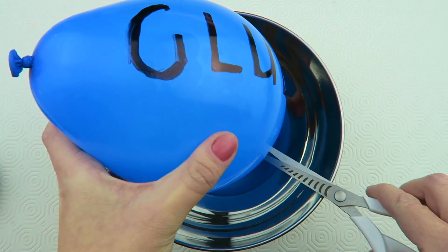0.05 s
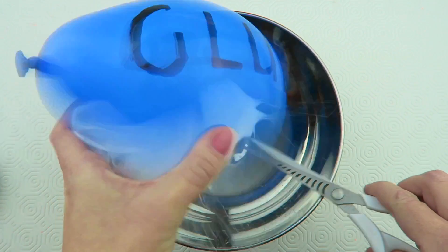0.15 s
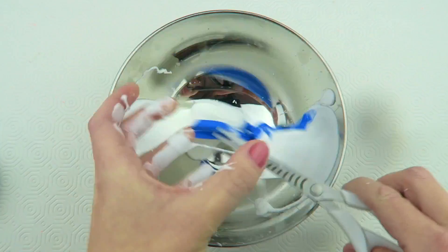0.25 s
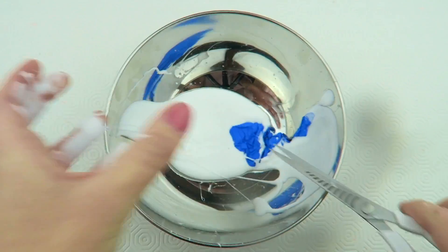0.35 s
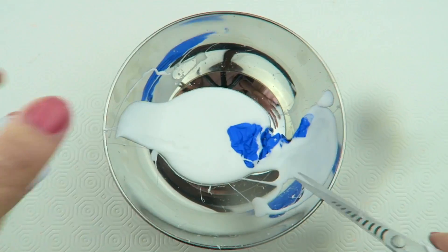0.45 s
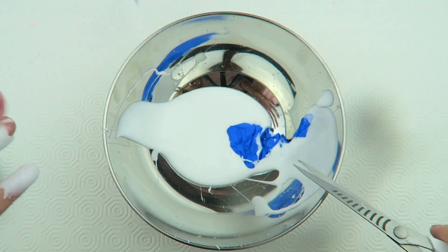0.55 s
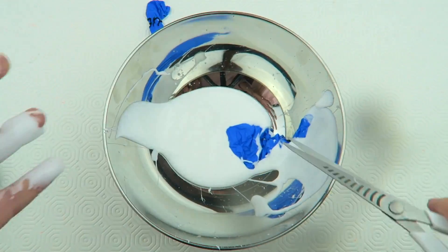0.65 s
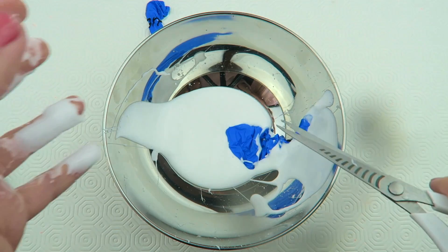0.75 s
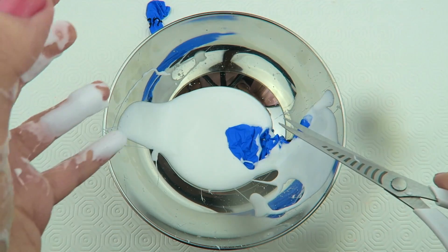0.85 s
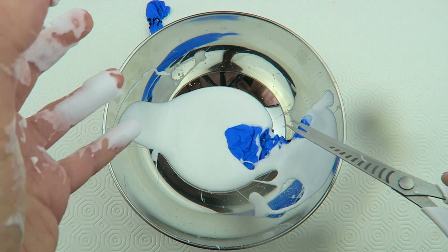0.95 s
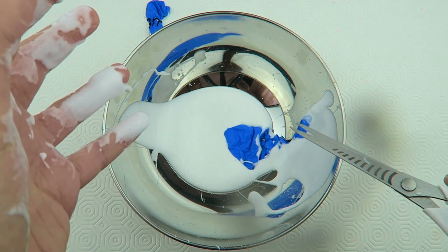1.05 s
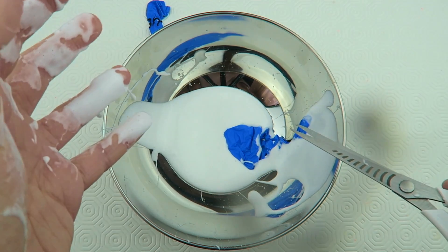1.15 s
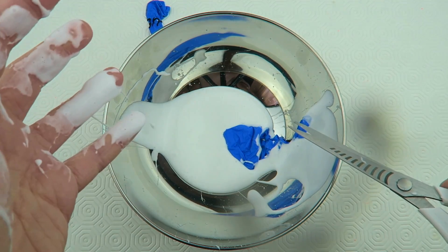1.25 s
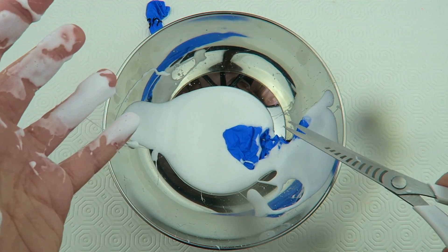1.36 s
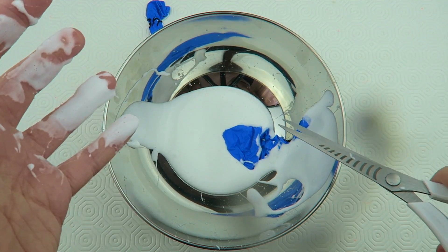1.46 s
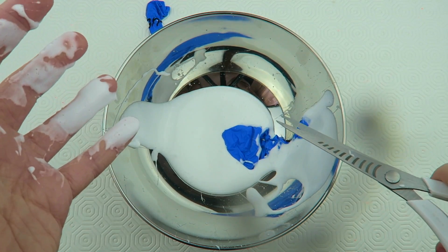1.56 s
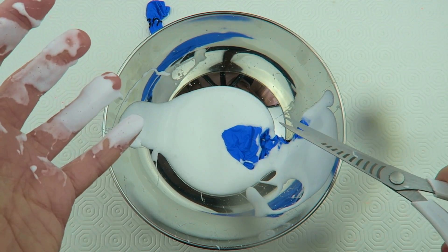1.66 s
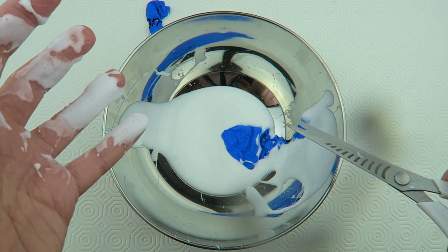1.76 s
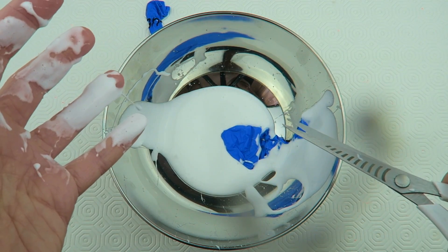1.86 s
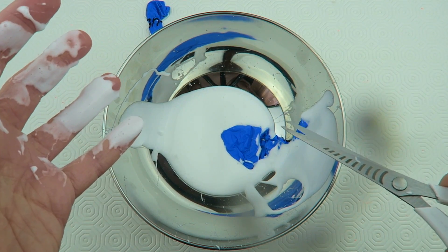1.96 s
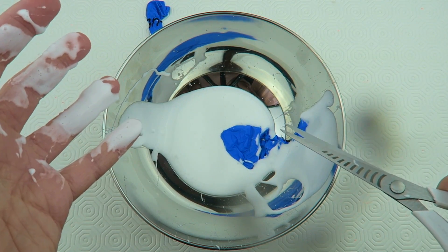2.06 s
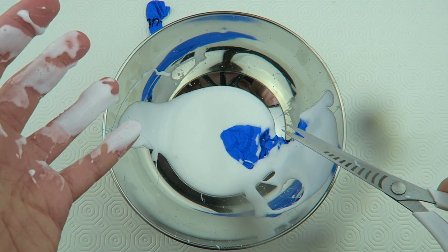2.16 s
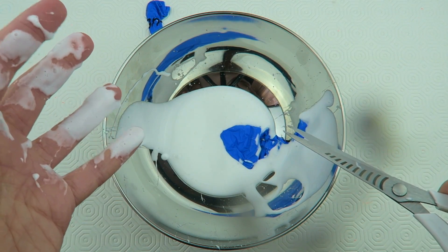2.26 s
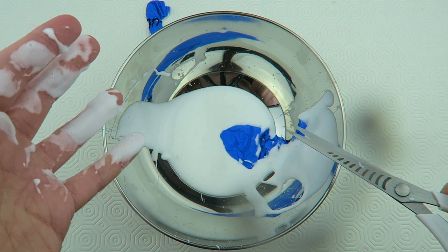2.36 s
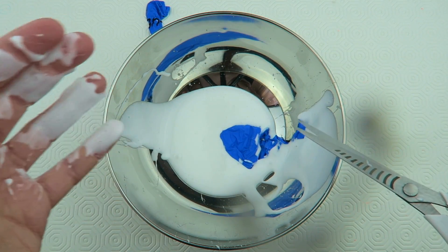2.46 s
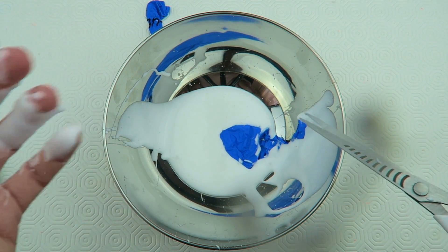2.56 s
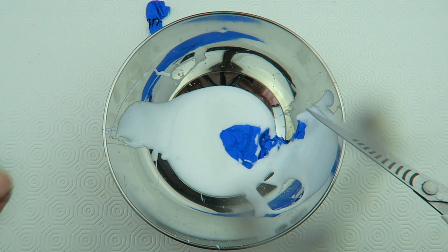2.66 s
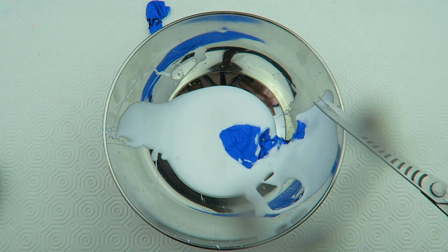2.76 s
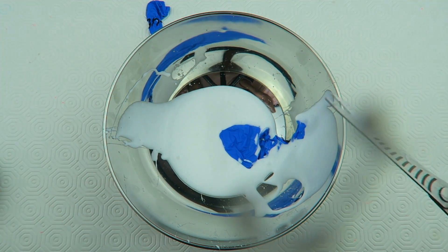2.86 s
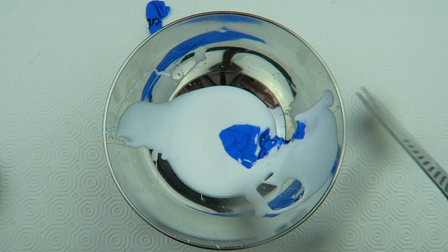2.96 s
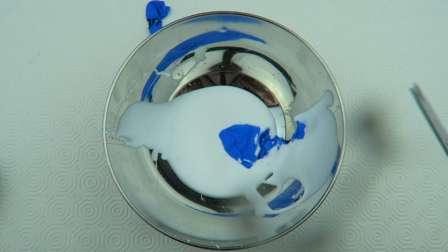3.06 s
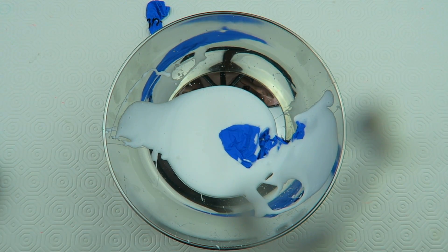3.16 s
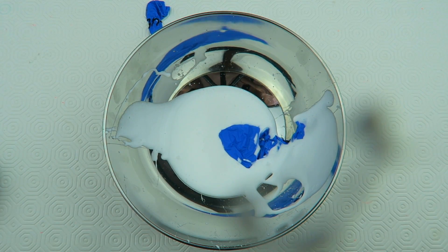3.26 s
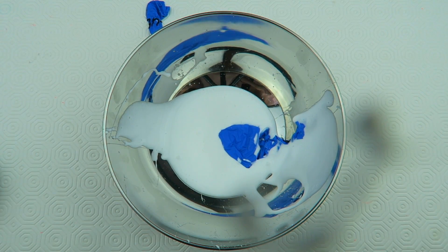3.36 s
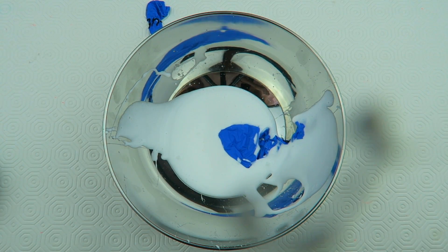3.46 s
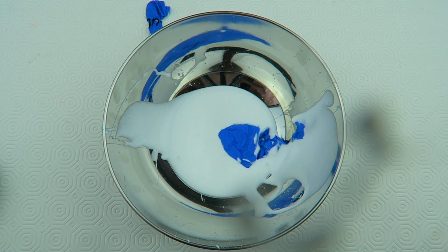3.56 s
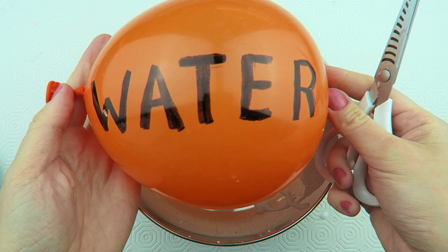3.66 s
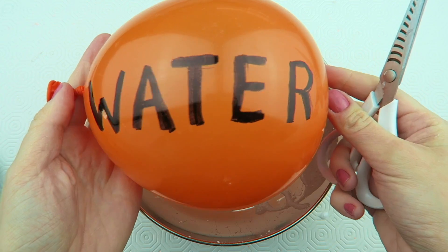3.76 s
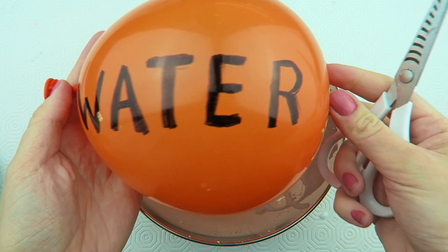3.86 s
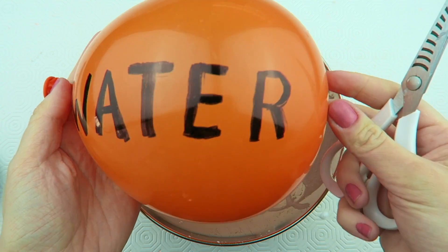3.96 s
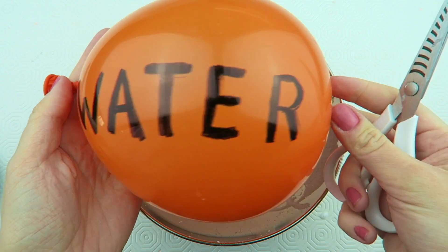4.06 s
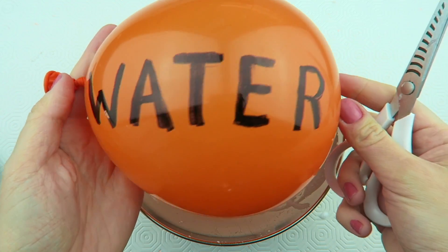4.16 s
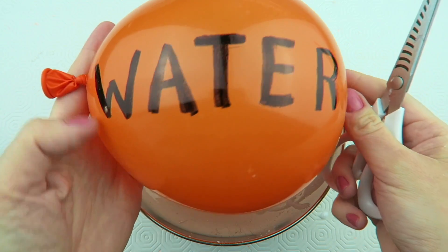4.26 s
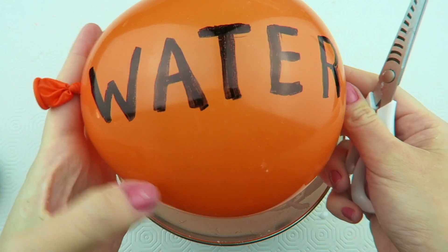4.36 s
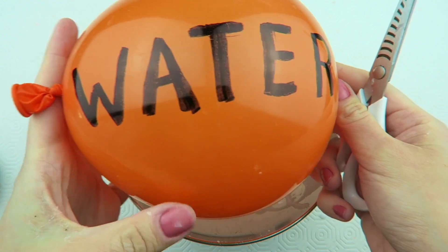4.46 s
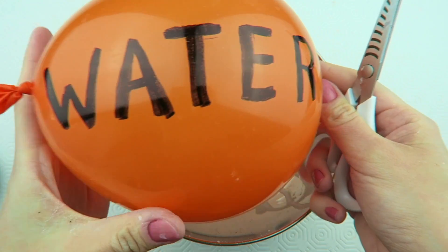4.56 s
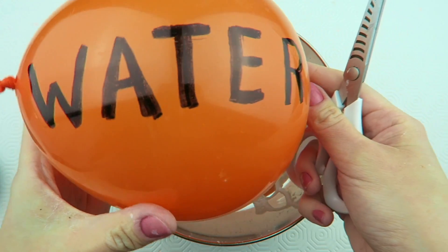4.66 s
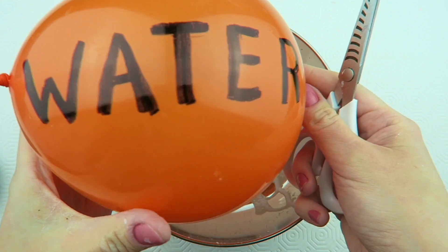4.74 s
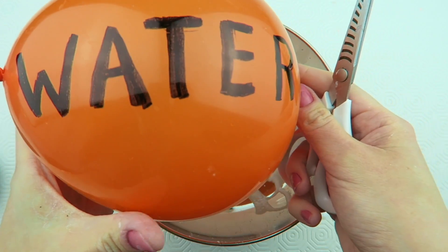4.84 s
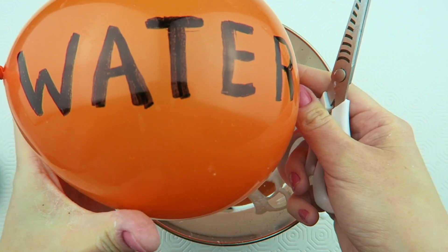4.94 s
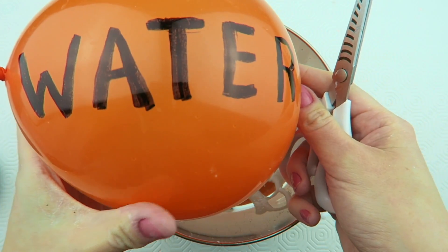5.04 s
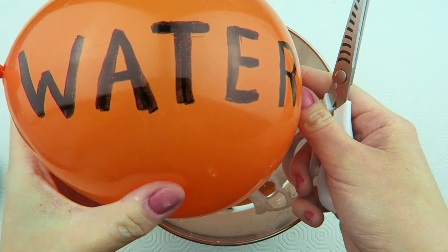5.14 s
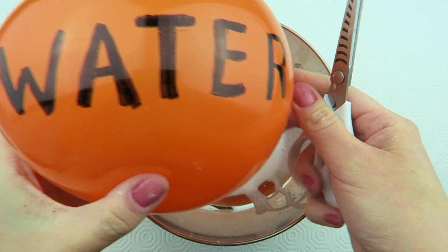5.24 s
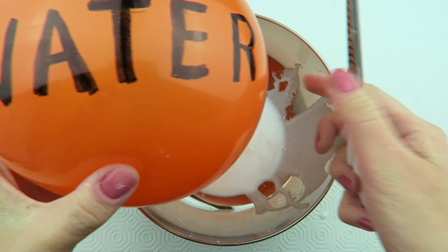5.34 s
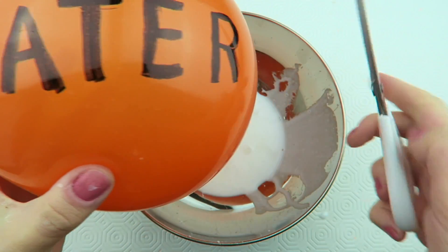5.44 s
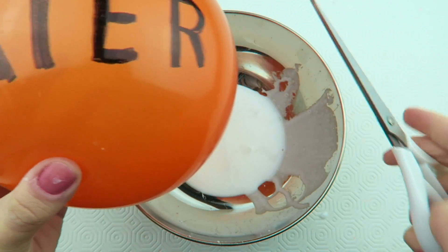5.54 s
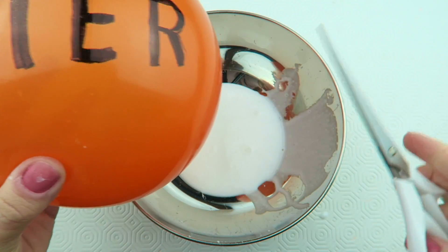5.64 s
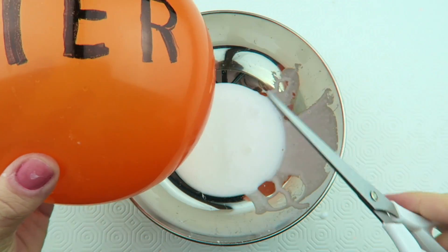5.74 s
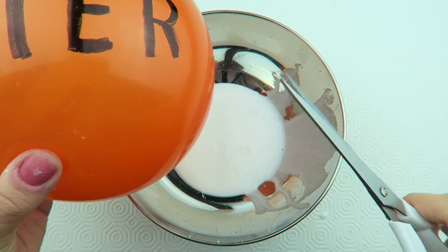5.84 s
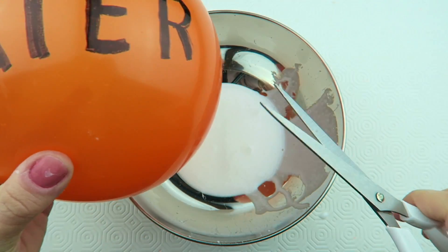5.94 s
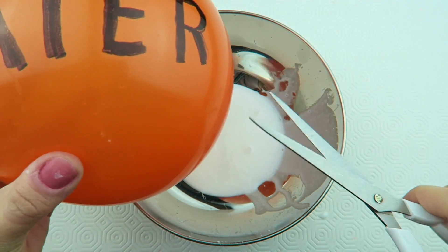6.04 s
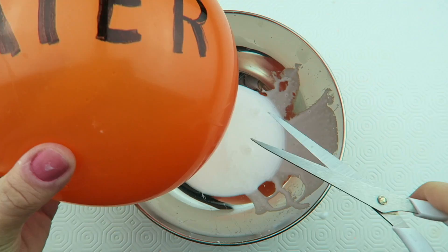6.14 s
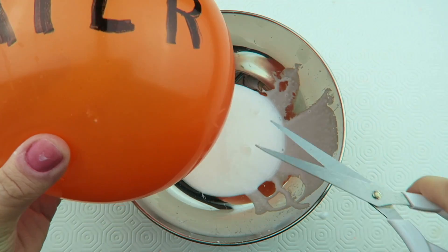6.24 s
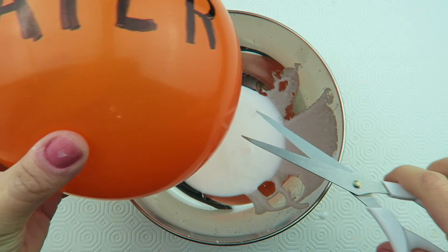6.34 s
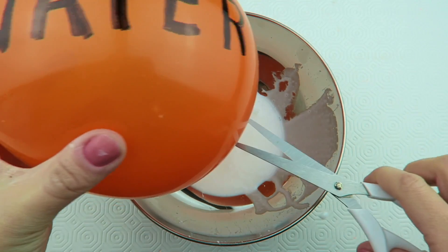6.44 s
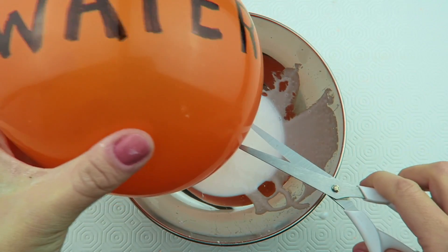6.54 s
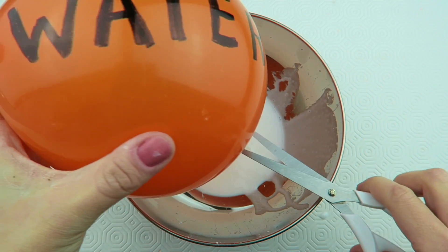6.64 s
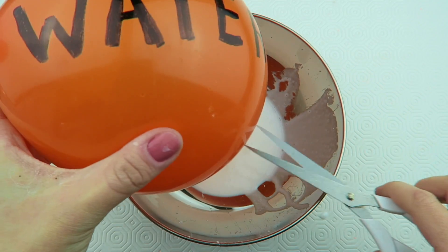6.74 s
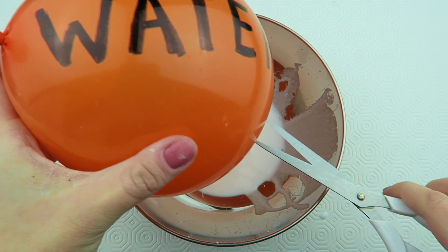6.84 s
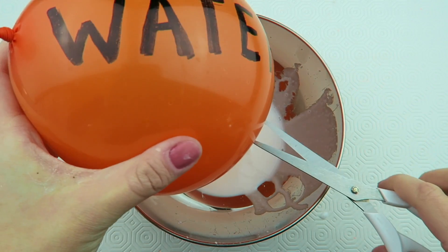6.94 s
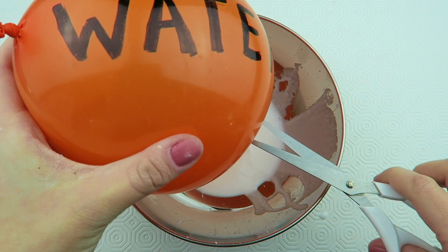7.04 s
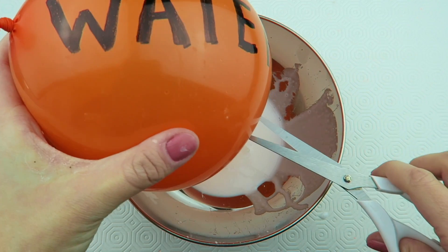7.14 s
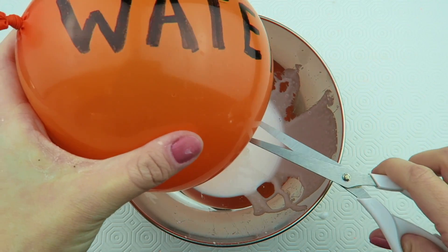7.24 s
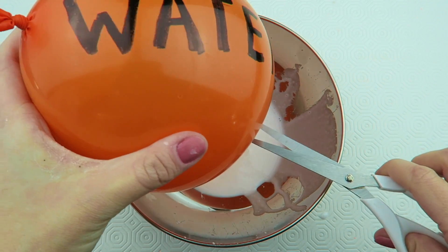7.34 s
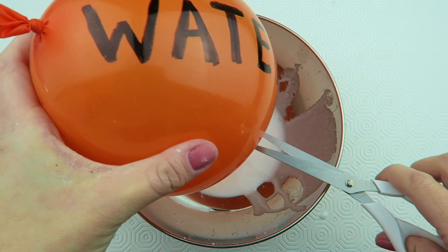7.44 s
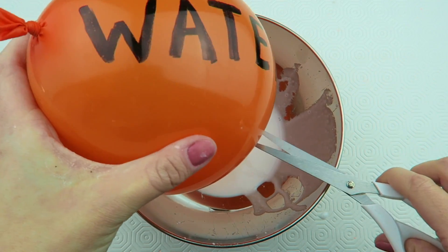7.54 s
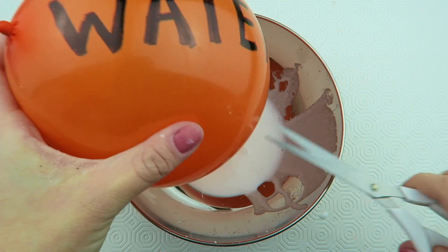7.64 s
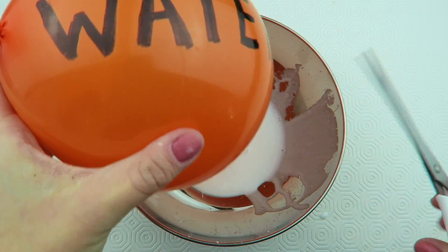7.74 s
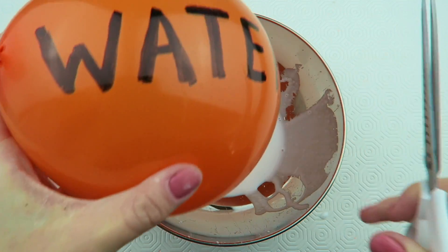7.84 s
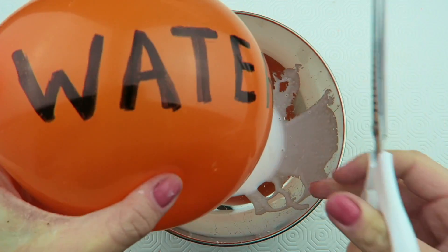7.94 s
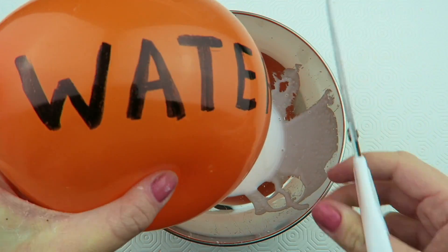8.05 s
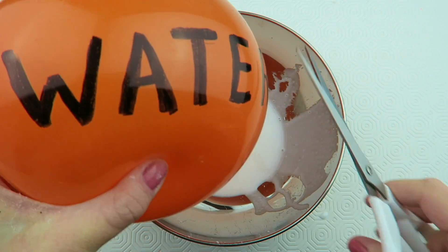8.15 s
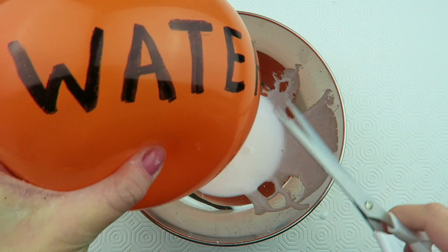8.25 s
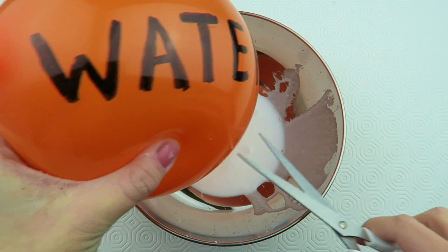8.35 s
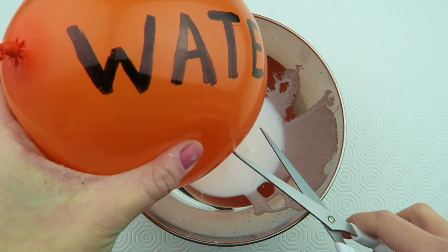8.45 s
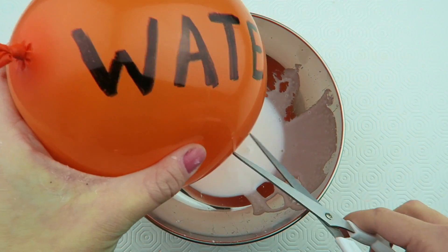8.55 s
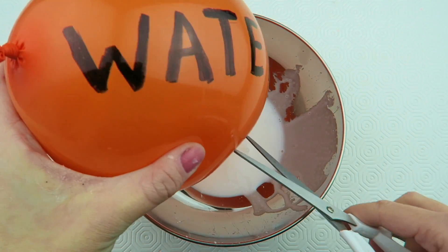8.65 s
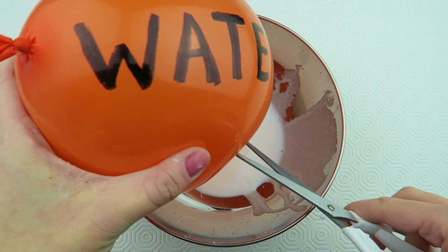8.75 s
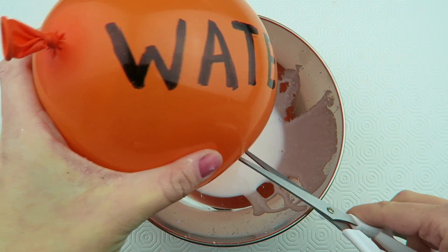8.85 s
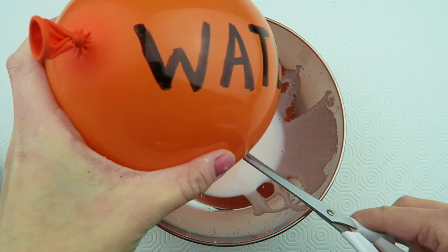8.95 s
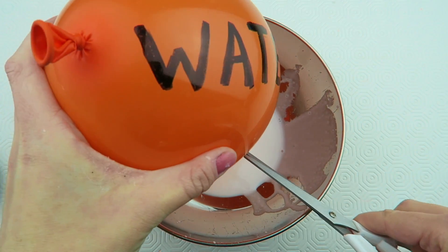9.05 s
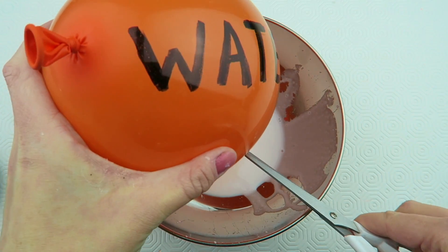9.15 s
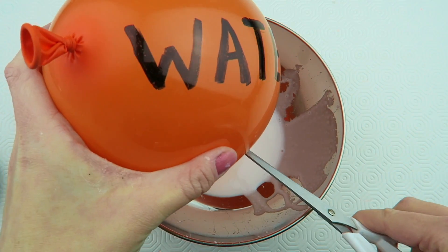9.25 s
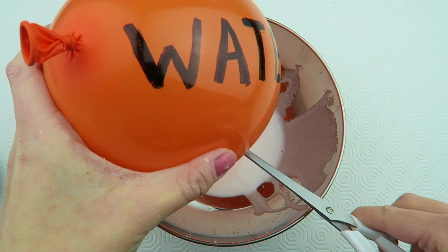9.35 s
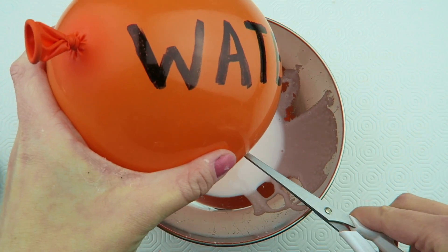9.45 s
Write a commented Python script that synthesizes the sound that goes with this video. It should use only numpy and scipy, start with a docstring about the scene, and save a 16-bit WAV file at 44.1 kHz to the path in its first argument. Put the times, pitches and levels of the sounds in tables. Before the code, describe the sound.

Loud balloon pop with wet splats and a shimmering metal bowl tap, a quiet humming lull, then squeaky rubber handling with scattered dull snaps.

```python
"""A humming room with faintly singing scissors and a dull snap, then the bang of a glue-filled balloon.
Noise-driven resonances form the burst and the wet slaps; paired, beating sines form the steel bowl that the
blades tap. Then a taut water balloon is handled: stick-slip noise rubs, kicked resonances snap and the blades
slide again. The burst overloads a close camera, whose gain control ducks the room for about two seconds."""
import sys
import numpy as np
from scipy import signal
from scipy.fft import rfft, irfft, next_fast_len
from scipy.io import wavfile
from scipy.ndimage import uniform_filter1d, minimum_filter1d, map_coordinates

SR = 44100
rng = np.random.default_rng(int(sys.argv[2]) if len(sys.argv) > 2 else 0)


def waveform_to_disk(signal):
    """Save audio, clipped to [-1, 1], as 16-bit WAV at the path in sys.argv[1]."""
    frames = np.transpose(np.atleast_2d(signal))
    scaled = np.clip(frames, -1, 1) * 32767
    samples = np.round(scaled).astype(np.int16)
    wavfile.write(sys.argv[1], SR, samples)


N = 418950
TIME = np.arange(N) / SR
AGE = TIME[:SR // 3]  # time since the start of a short event, s


def amp(db):
    """Level law: decibels to amplitude gain."""
    return 10 ** (np.asarray(db) / 20)


def unit(x):
    """Normalization: x at rms 1."""
    return x / np.sqrt(np.mean(x ** 2) + 1e-20)


def along(points, hz):
    """Logarithmic interpolation of (f/Hz, value) points over frequency."""
    f, v = np.transpose(points)
    return np.interp(np.log(hz + 1), np.log(f + 1), v)


def curves(rows):
    """Linear interpolation in time: one curve for each column after t/s."""
    s, *cols = np.transpose(rows)
    return [np.interp(TIME, s, c) for c in cols]


def wobble(rate):
    """Slow random modulation: a smooth curve through `rate` random knots a second."""
    knots = rng.standard_normal(int(N * rate / SR) + 4)
    return map_coordinates(knots, [TIME * rate])


def swell(s, half):
    """Gaussian envelope around time s, with standard deviation `half` in seconds."""
    return np.exp(-.5 * np.minimum(((TIME - s) / half) ** 2, 10 ** 2))


def filtered(x, response):
    """Linear filtering: the spectrum of x times a complex response of frequency."""
    n = x.shape[-1]
    m = next_fast_len(n + SR // 5)
    return irfft(rfft(x, m) * response(np.fft.rfftfreq(m, 1 / SR)), m)[..., :n]


def resonance(f, centre, width):
    """Damped oscillator: its response to frequency f, with unit gain at the centre."""
    return 1j * f * width / (centre * centre - f * f + 1j * f * width)


def resonant(x, modes):
    """Modal superposition: x drives parallel resonances of alternating sign."""
    def response(f):
        return sum((-1) ** k * amp(db) * resonance(f, c, w) for k, (c, w, db) in enumerate(modes))
    return filtered(x, response)


def band(x, lo_hz, hi_hz, order=2):
    """Causal Butterworth band-pass."""
    edges = [lo_hz, min(hi_hz, SR / 2 - 1)]
    return signal.sosfilt(signal.butter(order, edges, 'band', fs=SR, output='sos'), x)


# stereo width of close sounds: (f/Hz, side minus mid level/dB)
NEAR_WIDTH = [(60, -18.5), (150, -14.5), (950, -18.5), (2400, -12.5), (6000, -2.5), (15000, 2.5)]


def diffuse(n, width=NEAR_WIDTH):
    """Interchannel coherence: mid and side noise share the power as the width table sets."""
    def shares(hz):
        spread = amp(along(width, hz))
        return np.array([np.ones_like(hz), spread]) / np.hypot(1, spread)
    mid, side = filtered(rng.standard_normal((2, n)), shares)
    return np.array([mid + side, mid - side])


def add(track, s, sound):
    """Superposition: mix a sound into the track at time s."""
    part = track[:, max(round(s * SR), 0):][:, :sound.shape[-1]]
    part += sound[..., :part.shape[1]]


def voiced(x, thud_db, crack_db, tone_hz=700):
    """Spectral balance: weigh a blow's bass and treble against its middle, each by its first 20 ms."""
    thud = band(x, 69, 235, order=3)
    body = band(x, tone_hz / 2, tone_hz * 2.3, order=3)
    crack = band(x, 2300, 15000, order=3)
    levels = (thud_db, thud), (0, body), (crack_db, crack)
    return sum(amp(db) * p / np.sqrt(np.mean(p[:, :SR // 50] ** 2)) for db, p in levels)


def tilted(x, db_per_octave, knee_hz=3000):
    """Spectral tilt above a knee."""
    return filtered(x, lambda hz: amp(db_per_octave * np.log2(np.maximum(hz / knee_hz, 1))))


# resonances of the gap between balloon and bowl: (f/Hz, width/Hz, level/dB re the direct sound)
GAP_MODES = [(610, 59, -2.5), (846, 57, 0.5), (1056, 81, 0.5), (1335, 50, -2), (1500, 77, -3),
             (1990, 30, -3), (2350, 45, -3), (2830, 32, -4.5), (3170, 110, -2), (3704, 50, -0.5),
             (4754, 180, -2.5), (5413, 90, -1), (6300, 120, -2)]


def hollow(x, stretch=1.0):
    """Cavity resonance: x plus the narrow modes of the gap, whose frequencies scale with `stretch`."""
    def response(f):
        return 1 + sum(amp(db) * resonance(f, c * stretch, w) for c, w, db in GAP_MODES)
    return filtered(x, response)


# spectrum of the room at rest: (f/Hz, relative level/dB per Hz)
AIR_SPECTRUM = [(13, -38), (22, -13), (135, -10.5), (233, -10), (275, -10), (489, -13.5), (530, -16.5),
                (1110, -21), (1240, -24), (1460, -24), (10600, -43.5), (12400, -49), (15500, -71)]
# stereo width of the room's hiss: (f/Hz, side minus mid level/dB)
FAR_WIDTH = [(60, -22.5), (150, -7.5), (380, 1.5), (950, 2), (15000, 2.5)]
# resonances of the drone: (f/Hz, width/Hz, relative level/dB)
DRONE_MODES = [(110, 12, -17), (128, 10, -14.5), (172, 34, -15.5), (236, 17, -25)]
# level of the deep bass: (t/s, level/dB)
RUMBLE_LEVEL = [(0, -52.5), (1, -64), (1.9, -67), (2.3, -57), (3.1, -51.5), (4.2, -56), (4.7, -51),
                (5.7, -53), (7.3, -55), (9.5, -55)]
# reference level of the hum and drone together: (t/s, level/dB)
HUM_LEVEL = [(0, -58), (1.2, -48.5), (2.4, -50), (2.55, -43), (3.4, -44.5), (3.7, -51.5), (9.5, -52.5)]


def background(air_db=-51, hum_hz=125, hum_db=-4, drone_db=-5.5, waver_db=2.5, drift=.7, surge_db=3):
    """Stationary and modulated noise: room hiss, a surging rumble and a wavering low hum."""
    def air_response(hz):
        return amp(along(AIR_SPECTRUM, hz)) * np.hypot(1, amp(along(FAR_WIDTH, hz)))
    air = unit(filtered(diffuse(N, FAR_WIDTH), air_response))
    drone = unit(resonant(rng.standard_normal(N), DRONE_MODES) * amp(surge_db * wobble(5.7)))
    rumble = unit(band(rng.standard_normal(N), 22, 71) * amp(surge_db * wobble(5)))
    phase = 2 * np.pi * hum_hz * TIME + drift * wobble(6)
    hum = unit(np.sin(phase) * amp(waver_db * wobble(8.1)))
    low = amp(hum_db) * hum + amp(drone_db) * band(drone, 60, 330)
    return amp(air_db) * air + amp(curves(RUMBLE_LEVEL)[0]) * rumble + amp(curves(HUM_LEVEL)[0]) * low


# activity of the focus motor: (t/s, level/dB before the common trim)
FOCUS_LEVEL = [(1.45, -110), (1.5, -68.5), (2.27, -68), (2.35, -77), (2.88, -76.5), (2.96, -69), (3.7, -67),
               (4.2, -72), (9.5, -70)]
# resonances of the lens barrel: (f/Hz, width/Hz, relative level/dB)
BARREL_MODES = [(3100, 280, -4.5), (3530, 120, -3), (4230, 220, -1.5), (5550, 400, -7)]


def lens(level_db=-1, whine_hz=7220, whine_db=-80):
    """Pulsed excitation: a focus motor ticks in the lens barrel in two busier spells, over a thin whine."""
    frame_hz, uneven_db, t60 = 29.97, 2, .055
    tick_age = ((TIME * frame_hz + 0.41 * wobble(frame_hz / 2)) % 1) / frame_hz  # s, about one a frame
    ticks = amp(-60 * tick_age / t60 + uneven_db * np.clip(wobble(frame_hz), -1, 1))
    whine = unit(resonant(diffuse(N), [(whine_hz, 80, 0)]))
    motor = unit(band(resonant(diffuse(N) * ticks, BARREL_MODES), 2600, 6200))
    return amp(level_db + curves(FOCUS_LEVEL)[0]) * motor + amp(whine_db) * whine


# the blades sliding on each other: (middle t/s, Gaussian half length/s, level/dB)
BLADE_SLIDES = [(0.158, 0.36, -62), (3.993, 0.061, -71), (5.772, 0.14, -67), (6.642, 0.03, -58.5),
                (6.978, .03, -71.5)]
# resonances of the blades: (f/Hz, width/Hz, relative level/dB)
BLADE_MODES = [(5950, 90, -5.5), (6940, 80, -5), (7700, 120, -4.5), (8420, 91, -10)]


def scissors():
    """Friction-driven resonance: the sliding edges make the blades sing faintly."""
    pressure = sum(amp(db) * swell(s, half) for s, half, db in BLADE_SLIDES)
    return pressure * unit(resonant(diffuse(N) * amp(3 * wobble(65)), BLADE_MODES))


# resonances of the balloon over the bowl: (f/Hz, width/Hz, relative level/dB)
BALLOON_MODES = [(136, 140, 2.5), (312.1, 140, 4.5), (567, 110, 1), (954, 220, -5), (1560, 190, -6.5),
                 (1940, 570, -8), (2970, 380, -9), (3480, 660, -13.5), (6950, 5200, -26.5),
                 (11000, 2000, -27.5)]
# overtones of the taut skin before tension scatter: (f/Hz, relative level/dB)
SKIN_OVERTONES = [(1090, -1), (1300, -0.5), (1430, -1.5), (1570, -0.5), (1818, -1), (2095, -5),
                  (2460, -5.5), (2920, -7)]
HARD_DB, DB_PER_DOUBLE_LIFE = -22, 30  # level of a hard snap; dB that double the flutter's life
DULL_HZ = 469.4  # the dullest snaps sound no lower than this
TONE_HZ, TONE_OCT_PER_DB = 770, 0.15  # upper tone at crack 0 dB; a duller snap sounds lower


def snap(db, crack_db, thud_db, note_hz, release_db=14, flutter_t60=.08, wobble_db=-15, wobble_t60=0.12,
         note_db=-3, note_t60=0.076, undertone_db=-9, ring_db=-15, ring_t60=0.11):
    """Stick-slip release: one rounded kick; the skin flutters, rings with its tension, wobbles on water."""
    n = len(AGE)
    kick_db, rise_s, kick_cycles = 13, .0006, .13
    tone_hz = np.hypot(DULL_HZ, TONE_HZ * 2 ** (TONE_OCT_PER_DB * crack_db))
    life = 2 ** ((db - HARD_DB) / DB_PER_DOUBLE_LIFE)  # softer snaps flutter for less time
    onset = 1 - np.exp(-AGE / rise_s)
    slip = diffuse(n) * amp(-60 * AGE / (flutter_t60 * life)) * onset
    slip[:, round(rise_s * SR)] += amp(release_db)
    slip += band(diffuse(n), 220, 1100, order=1) * amp(wobble_db - 60 * AGE / wobble_t60)
    stretch = 1 + .035 * rng.standard_normal()
    flutter = voiced(hollow(resonant(slip, BALLOON_MODES), stretch), thud_db, crack_db, tone_hz)
    phase = 2 * np.pi * note_hz * AGE
    undertone = amp(undertone_db + thud_db) * np.sin(phase / 2)
    note = (np.sin(phase) + undertone) * amp(note_db - 60 * AGE / note_t60)
    ring = sum(amp(level + rng.normal(0, 2)) * np.sin(2 * np.pi * (hz * stretch * AGE + rng.random()))
               for hz, level in SKIN_OVERTONES)
    ring = ring * amp(ring_db + crack_db / 4 - 60 * AGE / ring_t60) * onset
    pulse = np.exp(-.5 * ((AGE - rise_s) * tone_hz / kick_cycles) ** 2)
    kick = band(pulse, tone_hz / 2, 6 * tone_hz)
    return amp(db) * (flutter + note + ring + amp(kick_db) * kick / np.abs(kick).max())


# fingers and blades slipping off the rubber: (t/s, level/dB before the common trim,
# crack/dB and thud/dB re the body, note f/Hz, treble tilt/dB per octave)
SNAP_EVENTS = [(.065, -37, -30, -18, 890, -9), (4.527, -32, -13.5, -4, 893, -3.5),
               (4.57, -29.5, -5.5, -11, 1027, 2), (4.858, -33.5, -25, 3, 600, -6),
               (4.878, -36.5, -29, -2, 404, -5), (4.942, -42, -9, -12, 1040, -3),
               (4.993, -28.5, -13, -6, 903, -5), (5.016, -32, -9.5, -8, 1034, -2),
               (5.057, -39.5, -14, -4, 624, -3), (5.09, -39.5, -13.5, -5, 616, -4),
               (5.104, -39.5, -7.5, -7, 603, -2.5), (5.196, -38.5, -30, -10, 690, -4),
               (5.204, -33.5, -19.5, -7, 655, -7), (5.243, -40.5, -14, 1, 607, -4),
               (5.284, -34, -14.5, -6, 756, -3), (5.321, -35, -20, -4, 720, -1),
               (5.336, -36.5, -14.5, -5, 836, 2), (5.433, -23, -2, -13.5, 812, -1.5),
               (5.942, -46, -12, 2, 570, 4), (5.978, -36, -13.5, 3, 550, 0),
               (6.023, -22, -6, -8.5, 622, 1.5), (6.151, -37, -27, 2, 542, -4),
               (6.26, -21.5, -7, -4, 602, -1.5), (6.504, -40, -26, -0.5, 470, -4),
               (6.558, -37.5, -18.5, 0, 520, -1), (6.667, -34.5, -17.5, -0.5, 606, -4),
               (6.714, -43, -23, -5, 610, -3), (6.788, -35, -25, -2, 466, -1),
               (7.194, -47, -6, 1.5, 610, 2.5), (7.718, -24.5, -5.5, -1, 562, -1),
               (8.006, -24.5, -5, -5, 600, 3), (8.031, -32.5, -17, -10, 610, -3),
               (8.189, -40.5, -14, -7, 610, -2), (8.266, -48.5, -19, -5, 560, 0),
               (8.283, -49.5, 0.5, -2.5, 594, 1), (8.291, -44.5, -22, -2, 554, 0),
               (8.397, -33, -21, -12, 893, -3), (8.497, -33, -7, -3.5, 1055, 1),
               (8.577, -39.5, -23.5, -7.5, 555, -3), (8.621, -38, -14, 0, 587, 1),
               (8.643, -23, -14.5, -3, 610, 0), (8.659, -19.5, 0.5, -9, 639, 3),
               (8.767, -36, -22, -5, 555, -2), (9.082, -36, -31, -4, 543, -6),
               (9.225, -49, -12, -2, 560, -2), (9.3486, -31, -31, -5.5, 527, -11),
               (9.3607, -33, -38, -10, 535, -11)]
# how hard the holding hand rubs: (t/s, reference level/dB)
GRIP_LEVEL = [(3.7, -67), (3.95, -48), (4.25, -61), (4.55, -44), (4.8, -50.5), (5.3, -48), (5.48, -43.5),
              (5.6, -73.5), (5.85, -53), (6.08, -39.5), (6.35, -55), (6.7, -46), (6.9, -57), (7.2, -52),
              (7.55, -69), (8.14, -52), (8.7, -41), (9.0, -76)]


def snaps(level_db=-2, count=12, over_grip_db=-2, creep_crack_db=-8):
    """Stick-slip events: clear snaps, and faint random ones that follow the grip as the fingers creep."""
    out = np.zeros((2, N))
    for s, db, crack_db, thud_db, note_hz, tilt_db in SNAP_EVENTS:
        add(out, s, tilted(snap(db + level_db, crack_db, thud_db, note_hz), tilt_db))
    grip_s, grip_db = np.transpose(GRIP_LEVEL)
    for s in rng.uniform(grip_s[0], TIME[-1], count):
        creep_db = np.interp(s, grip_s, grip_db) + over_grip_db
        add(out, s, snap(creep_db, creep_crack_db, thud_db=-8, note_hz=900))
    return out


# wet clumps landing and, in the last row, a second light tap on the bowl:
# (t/s, reference level/dB, thud/dB and spray/dB re the middle, t60/s,
# treble tilt/dB per octave, starting plop f/Hz, relative plop level/dB)
SPLAT_EVENTS = [(.270, -27, -14.5, -3, .09, 3, 700, -8), (.291, -7, -9, -2.5, 0.19, 0.5, 910, -1.5),
                (.33, -8, -0.5, -5, 0.042, -7, 2710, -10), (.34, -19, 2.5, -8, .06, -7, 2650, -9),
                (.383, -20.5, -10, -3, 0.026, -0.5, 2100, 10), (.407, -23.5, -7, -2.5, 0.05, 1.5, 1520, 3),
                (.706, -43, 0, 9, 0.057, 1, 2200, -4)]


def glue(landing_s=.327, thump_db=-12, thump_t60=.13, slosh_db=-35, slosh_t60=2.1,
         spray_db=-24, spray_t60=.65, plop_attack_s=.0015, plop_rise=0.97):
    """Impact and bubble resonance: clumps slap and plop, a light tap follows; the bulk thumps and spatters."""
    out = np.zeros((2, N))
    for s, db, thud_db, crack_db, t60, tilt_db, plop_hz, plop_db in SPLAT_EVENTS:
        # the noise changes strength every 40 samples
        clumps = amp(3 * np.repeat(rng.standard_normal(len(AGE)), 40)[:len(AGE)])
        fade = amp(-60 * AGE / t60) * (1 - np.exp(-AGE / plop_attack_s))
        force = diffuse(len(AGE)) * clumps * fade
        slap = voiced(resonant(force, BALLOON_MODES), thud_db, crack_db, tone_hz=910)
        plop = amp(plop_db + 6) * fade * np.sin(2 * np.pi * plop_hz * AGE * (1 + plop_rise * AGE))
        add(out, s, amp(db) * tilted(slap + plop, tilt_db))
    t = TIME[:SR]
    weight = amp(thump_db - 60 * t / thump_t60) + amp(slosh_db - 60 * t / slosh_t60)
    add(out, landing_s, weight * unit(band(rng.standard_normal(SR), 25, 100)))
    droplets = diffuse(SR) * amp(4 * wobble(500)[:SR])
    spatter = unit(band(band(hollow(droplets), 500, 2000, order=1), 400, 4200))
    add(out, landing_s, amp(spray_db - 60 * t / spray_t60) * spatter)
    return out


# stereo width of the flying skin: (f/Hz, side minus mid level/dB)
SKIN_WIDTH = [(60, -22.5), (500, -14), (1000, -2), (10000, 0)]
# resonances of the bursting skin: (f/Hz, width/Hz, relative level/dB)
BANG_MODES = [(123, 46, 2.5), (319, 40, 6), (469, 130, 0.5), (645, 41, 7), (865, 43, 0), (1640, 500, -12)]


def burst(s=.277, kick_db=30, t60=0.11, tear_db=-3, tear_t60=0.11):
    """Impulsive pressure release: one violent kick as the skin rips, then the noise of tearing rubber."""
    out, level_db = np.zeros((2, N)), 10
    force = diffuse(len(AGE), SKIN_WIDTH) * amp(-60 * AGE / t60)
    force[:, 0] = amp(kick_db)
    bang = resonant(force, BANG_MODES)
    bang = bang / np.sqrt(np.mean(bang[:, :SR // 100] ** 2))  # rms 1 over the first 10 ms
    tear = unit(band(diffuse(len(AGE)), 900, 4500, order=1)) * amp(-60 * AGE / tear_t60)
    add(out, s, amp(level_db) * bang + amp(tear_db) * tear)
    return out


# modes of the steel bowl: (f/Hz, relative level/dB, t60/s, beat f/Hz, twin strength 0-1, first lull t/s)
BOWL_MODES = [(467, -11, 2.3, 0, 0, 0), (793, -1, .25, 0, 0, 0), (888, -4, .25, 0, 0, 0),
              (1017, -9, 1.45, 2.95, .85, .075), (1771, 3.5, .92, 6.5, .24, .045),
              (2696, -.5, .68, 7.5, .4, .03), (3677, -9, .55, 8.3, .8, .095),
              (4330, -20, .35, 11, .5, .045), (4544, -6, .22, 14, .3, .045), (5626, -11, .3, 17, .4, .03),
              (6659, -13, .22, 21, .5, .025), (7601, -17, .24, 17, .5, .03), (8166, -18, .23, 25, .5, .02),
              (8969, -20, .18, 19, .5, .03), (10150, -21, .18, 23, .5, .02)]


def bowl(s=.565, ring_db=-24, clang_db=-17, clang_t60=0.14, scrape_db=-19, rough_hz=7500):
    """Modal beating: the blades tap the bowl; most modes are close pairs that cancel at a lull, then beat."""
    out, t = np.zeros((2, N)), TIME[:2 * SR]
    for hz, db, t60, beat_hz, twin, lull in BOWL_MODES:
        phase = 2 * np.pi * hz * t + rng.uniform(0, 2 * np.pi) + 0.29 * rng.standard_normal((2, 1))
        # the blade still buzzes against the high modes
        phase = phase + (hz / rough_hz) ** 2 * wobble(160)[:len(t)]
        pair = np.sin(phase) - twin * np.sin(phase + 2 * np.pi * beat_hz * (t - lull))
        add(out, s, amp(ring_db + db - 60 * t / t60) * pair)
    # the blade chatters on the steel for a moment
    chatter = diffuse(len(AGE))
    clang = unit(resonant(chatter, [(hz, 90, db / 4) for hz, db, *_ in BOWL_MODES[1:]]))
    scrape = unit(band(band(chatter, 620, 4000, order=1), 300, 11500, order=3))
    add(out, s, amp(-60 * AGE / clang_t60) * (amp(clang_db) * clang + amp(scrape_db) * scrape))
    return out


def patchy(x, depth_db):
    """Time-varying colour: the spectrum of a rub shifts as the patch of contact moves."""
    z = signal.stft(x, nperseg=512)[2]
    field = uniform_filter1d(rng.standard_normal(z.shape[1:]), size=3, axis=0)  # smooth over frequency
    field = uniform_filter1d(field, size=7, axis=1)  # smooth over time
    return signal.istft(z * amp(depth_db * unit(field)), nperseg=512)[1][:, :N]


def crackle(effort, rate=160, level_db=-5, lo_hz=700, hi_hz=4500):
    """Random impulse train: skin unsticks in scattered tiny ticks that follow the hiss, somewhat fainter."""
    spread_db = 3.5
    ticks = (rng.random(N) < rate / SR) * amp(spread_db * np.clip(rng.standard_normal(N), -2, 2))
    shudder = diffuse(len(AGE)) * amp(-60 * AGE / .008)  # t60 8 ms
    grains = signal.fftconvolve(ticks[None], shudder, axes=1)[:, :N]
    return amp(level_db) * effort * unit(band(hollow(grains), lo_hz, hi_hz))


# strokes of skin over rubber: (middle t/s, Gaussian half length/s, level/dB, hiss level/dB re the stroke)
RUB_STROKES = [(4.063, 0.023, -44.5, -31), (4.361, 0.013, -34.5, -4.5), (4.466, 0.022, -53, 2),
               (4.588, 0.013, -37, -16), (4.626, 0.02, -34.5, -9), (4.741, 0.015, -35.5, -7.5),
               (4.746, 0.21, -52.5, 3.5), (4.913, 0.013, -41.5, -4.5), (5.244, 0.033, -40, -19),
               (5.333, 0.021, -35.5, -9.5), (5.925, 0.014, -48.5, -15), (6.66, 0.013, -43, -17),
               (6.957, 0.0099, -46.5, -9.5), (7.12, 0.051, -48.5, -14), (7.445, 0.013, -64, 4),
               (7.745, 0.038, -39, -7), (8.015, 0.028, -40.5, -3), (8.162, 0.053, -45.5, -9.5),
               (8.746, 0.041, -39.5, -9), (8.98, 0.026, -41, -7), (9.076, 0.022, -35, -19),
               (9.377, 0.014, -41.5, -32)]
# spectrum of skin on rubber: (f/Hz, relative level/dB per Hz)
HISS_SPECTRUM = [(710, -13), (1200, -2), (1650, -1), (2860, -8), (3320, -5), (4290, -14), (4930, -12.5),
                 (12100, -20.5), (15500, -36)]


def rubbing(body_db=-3.0, thud_db=-5, hiss_db=-14, stroke_thud_db=-4, grain_db=3.0, lurch_db=3.0):
    """Stick-slip friction: skin drags in tiny slips that drum on the balloon and hiss at its surface."""
    grip = amp(curves(GRIP_LEVEL)[0]) * (TIME > GRIP_LEVEL[0][0])
    thud, body, hiss = grip * amp(thud_db), grip * amp(body_db), grip * amp(hiss_db)
    for s, half, db, bright_db in RUB_STROKES:
        stroke = amp(db) * swell(s, half)
        thud = np.hypot(thud, amp(stroke_thud_db) * stroke)
        body = np.hypot(body, stroke)
        hiss = np.hypot(hiss, amp(bright_db) * stroke)
    slips = amp(grain_db * wobble(450) + lurch_db * wobble(70))
    drum = hollow(resonant(diffuse(N) * slips, BALLOON_MODES))
    fine_db, colour_db = 2.5, 2
    scuff = patchy(diffuse(N) * amp(fine_db * wobble(900) + wobble(40)), colour_db)
    surface = unit(filtered(hollow(scuff), lambda hz: amp(along(HISS_SPECTRUM, hz))))
    low = thud * unit(band(drum, 53.3, 188))
    middle = body * unit(band(drum, 398, 1170))
    return low + middle + hiss * surface + crackle(hiss)


def squeak(s=8.659, hz=3200, level_db=-7, t60=0.021):
    """Frictional oscillation: in the hardest snap the rubber gives a very short, shrill squeak."""
    out = np.zeros((2, N))
    tone = np.sin(2 * np.pi * hz * AGE + .5 * wobble(650)[:len(AGE)])
    add(out, s, amp(level_db - 60 * AGE / t60) * tone)
    return out


# colour of the reverberation: (f/Hz, level/dB)
REVERB_COLOUR = [(120, 0.5), (350, 3), (700, 1.5), (1400, 1), (2500, -2), (10000, -3)]
# reverberation time: (f/Hz, t60/s)
REVERB_TIME = [(150, 0.9), (450, .66), (1000, 0.2), (1600, .38), (3000, .28), (10000, 0.15)]


def room(x, wet_db=-9.0, delay=0.0044):
    """Reverberation: convolution with decaying noise from a small room, in which the bass lingers longest."""
    hz, t, z = signal.stft(diffuse(SR), SR, nperseg=256)
    colour_db = along(REVERB_COLOUR, hz)[:, None]
    decay_db = -60 * t / along(REVERB_TIME, hz)[:, None]
    tail = signal.istft(z * amp(colour_db + decay_db), SR, nperseg=256)[1]
    # the tail fades in over the delay
    tail = tail * np.clip(TIME[:tail.shape[1]] / delay, 0, 1) / np.sqrt(SR / 20)
    return amp(wet_db) * signal.fftconvolve(x, tail, axes=1)[:, :N]


def scene():
    """Direct and reverberant fields: the short bang and the bowl stir the room less than the rest."""
    pop = burst() + bowl()
    near = glue() + snaps() + squeak() + rubbing() + scissors()
    return pop + near + room(near + amp(-15.5) * pop) + background() + lens()


def smoothed(x, seconds):
    """Exponential averaging: a one-pole running mean."""
    step = 1 / (seconds * SR)
    return signal.lfilter([step], [1, step - 1], x)


def gain_control(x, hold=0.92, release=0.56):
    """Dynamic compression: an overload turns the gain down; it is held, then creeps back."""
    depth_db, attack = 13, .008
    level = smoothed(np.abs(x).mean(axis=0), .004)
    overload = np.clip((level - .6) / .3, 0, 1)
    count = int(hold * SR) // 2
    # running maximum over the past `hold` seconds
    held = -minimum_filter1d(-overload, 2 * count + 1, origin=count, mode='constant')
    # exponential release from every held peak
    cut = np.maximum.accumulate(held * np.exp(TIME / release)) * np.exp(-TIME / release)
    return x * amp(-depth_db * smoothed(cut, attack))


TOP_HZ, EDGE_ORDER = 15600, 70  # the camera's band limit and its steepness


def record(dry):
    """Nonlinear and band-limited transduction: gain control, full-scale clipping and a steep treble edge."""
    clipped = np.clip(gain_control(dry), -1, 1)
    return filtered(clipped, lambda hz: 1 / np.hypot(1, (hz / TOP_HZ) ** EDGE_ORDER))


dry = scene()
out = record(dry)
waveform_to_disk(out)
```